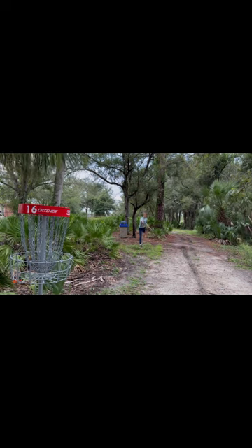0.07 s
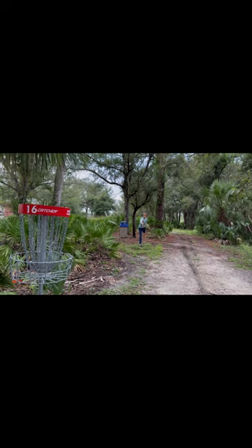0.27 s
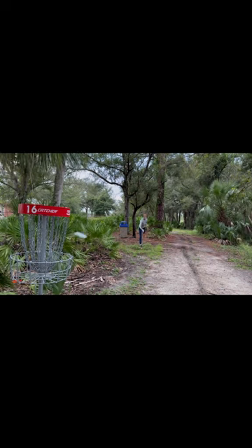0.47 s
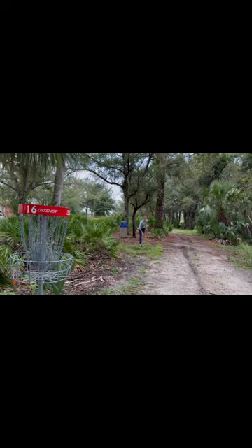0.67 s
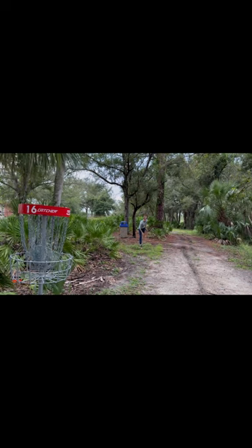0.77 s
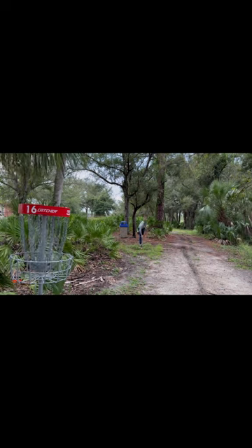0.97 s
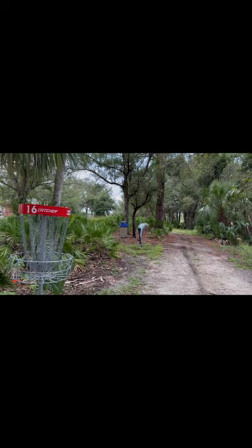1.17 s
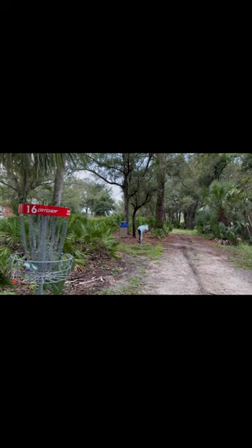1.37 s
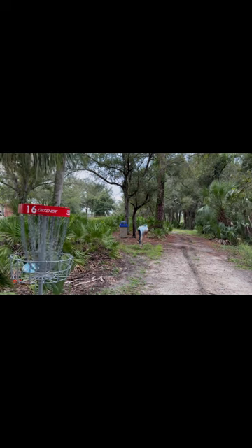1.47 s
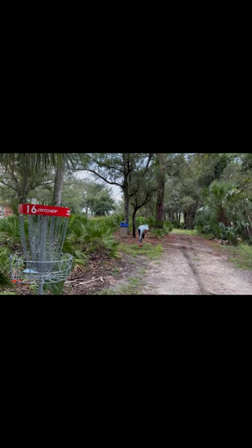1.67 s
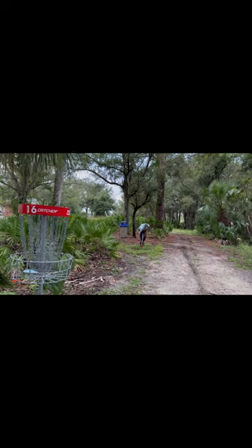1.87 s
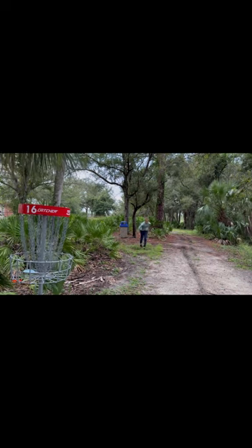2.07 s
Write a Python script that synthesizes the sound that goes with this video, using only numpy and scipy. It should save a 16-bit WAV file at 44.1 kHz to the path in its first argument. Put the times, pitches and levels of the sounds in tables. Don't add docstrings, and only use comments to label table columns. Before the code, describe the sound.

Metal chains of a disc golf basket clash and jingle as a plastic disc hits them outdoors

```python
import sys
import numpy as np
from scipy import signal
from scipy.fft import rfft, irfft, next_fast_len
from scipy.io import wavfile

SR = 44100
rng = np.random.default_rng(int(sys.argv[2]) if len(sys.argv) > 2 else 0)


def waveform_to_disk(signal):
    frames = np.transpose(np.atleast_2d(signal))
    scaled = np.clip(frames, -1, 1) * 32767
    samples = np.round(scaled).astype(np.int16)
    wavfile.write(sys.argv[1], SR, samples)


def natural_amplitude(level_db):
    exponent = np.asarray(level_db, float) / 20
    return 10 ** exponent


N = 93977

IMPACT_S = .5655
HIT_SPREAD_DB = 4.5


def in_time(rows):
    return np.interp(np.arange(N) / SR, *np.transpose(rows))


def at_hz(points, hz, column=1):
    points = np.array(points)
    return np.interp(np.log(hz + 1), np.log(points[:, 0]), points[:, column])


def rms_one(x):
    return x / np.sqrt(np.mean(x ** 2) + 1e-20)


def drift(rate_hz):
    r = np.exp(-2 * np.pi * rate_hz * 40 / SR)
    slow = signal.lfilter([1], [1, -2 * r, r * r], rng.standard_normal(N // 40 + 2002))
    slow = slow[2000:]
    return np.interp(np.arange(N) / 40, np.arange(len(slow)), rms_one(slow))


def ring(clicks, hz, t60):
    r, w = natural_amplitude(-60 / (t60 * SR)), 2 * np.pi * hz / SR
    return signal.lfilter([0, np.sin(w)], [1, -2 * r * np.cos(w), r * r], clicks + 1e-18)


def band_pass(x, low_hz, high_hz):
    return signal.sosfilt(signal.butter(2, [low_hz, high_hz], "band", fs=SR, output="sos"), x)


def grains(per_s, spread_db):
    sizes = natural_amplitude(spread_db * np.minimum(rng.exponential(1, N), 4)) * rng.choice([-1, 1], N)
    return sizes * (rng.random(N) < per_s / SR)


def clicks_at(s, height):
    clicks = np.zeros(N)
    clicks[(s * SR).astype(int)] = height
    return clicks


def struck(hits, modes, focus_db, rise_s, spread_db):
    s, db, centre_hz = np.transpose(hits)
    luck, out = rng.standard_normal((len(s), len(modes))), np.zeros(N)
    for (hz, level_db, t60), chance in zip(modes, luck.T):
        off_pitch_db = focus_db * abs(np.log2(hz / centre_hz))
        clicks = clicks_at(s, natural_amplitude(db + level_db + spread_db * chance - off_pitch_db))
        swell_t60 = 1 / (1 / t60 + 1 / (rise_s * np.log(1000)))
        out += ring(clicks, hz, t60) - ring(clicks, hz, swell_t60)
    return out


def bursts(hits, t60):
    s, db = np.transpose(hits)[:2]
    envelope = signal.lfilter([1], [1, -natural_amplitude(-60 / (t60 * SR))], clicks_at(s, natural_amplitude(db)) + 1e-18)
    return envelope * rng.standard_normal(N)


def scatter(x, t60):
    t = np.arange(int(.4 * SR)) / SR
    tail = rng.standard_normal(len(t)) * natural_amplitude(-60 * t / t60)
    return signal.fftconvolve(x, tail / np.sqrt(np.sum(tail ** 2)))[:N]


def ports(x, other, column):
    # Hz, radians for the basket, radians for the background.
    port_phase = np.array([(20, 0, 0), (1500, 1.5, .3), (1900, .5, .3), (2800, 2.2, .6), (3900, -.2, .6),
                           (6900, .9, .9), (7700, 3, 3), (8000, 5.9, 5.8), (9000, 6.2, 5.6), (9900, 4.1, 4),
                           (10400, 3.8, np.pi), (10750, np.pi, np.pi), (11750, np.pi, np.pi),
                           (12300, 2.5, np.pi), (13400, 0, 0)])
    # Hz, dB for the basket, dB for the background.
    port_tilt = [(200, .3, 0), (1000, 6, .8), (1700, 0, -.2), (3000, 4, 1.2), (5200, 3.5, 4),
                 (6200, 1.5, 5), (7700, 2.2, 5), (8400, 0, 0)]
    # Hz, correlation (0 to 1) for the basket, for the background.
    port_likeness = [(120, .8, .72), (400, .88, .55), (1500, .7, .2), (3500, .4, .45), (4300, .97, .4),
                     (6000, .55, .3), (8500, .9, .65), (9700, .5, .55), (10350, 1, 1)]
    size = next_fast_len(N + SR // 4)
    hz = np.arange(size // 2 + 1) * SR / size
    alike = at_hz(port_likeness, hz, column)
    lead = np.interp(hz, port_phase[:, 0], port_phase[:, column])
    same = np.sqrt((1 + alike) / 2) * rfft(x, size)
    apart = np.sqrt((1 - alike) / 2) * rfft(other, size)
    turn = natural_amplitude(-at_hz(port_tilt, hz, column)) * np.exp(-1j * lead)
    return irfft(np.array([same + apart, (same - apart) * turn]), size)[:, :N]


def air():
    # Hz, level in dB per Hz.
    air_colour = [(25, -70), (60, 4), (120, -5.5), (250, -12), (1000, -12), (3000, -29), (9500, -30),
                  (12000, -29), (14500, -27)]
    # time in seconds, level in dB.
    rumble_swell = [(0, -44), (.26, -45.5), (.55, -47.5), (.9, -48.5), (1.3, -43), (1.55, -42), (1.9, -44),
                    (2.13, -43.5)]
    edges, white, hiss = 25 * 2 ** np.arange(0, 9.6, .5), rng.standard_normal((2, N)), 0
    for k, (low, high) in enumerate(zip(edges, edges[1:])):
        level_db = at_hz(air_colour, np.sqrt(low * high)) + 1.5 * drift(21.0)
        hiss = hiss + band_pass(white[k % 2], low, high) * natural_amplitude(level_db)
    rumble_hz, rumble_width_hz = 68.3, 39
    rumble = ring(rng.standard_normal(N), rumble_hz, np.log(1000) / np.pi / rumble_width_hz)
    both = natural_amplitude(-42.5) * rms_one(hiss) + rms_one(rumble) * natural_amplitude(6.5 + in_time(rumble_swell))
    return signal.sosfilt(signal.butter(2, 62.5, "high", fs=SR, output="sos"), both)


def thumps():
    # start in seconds, peak in dB, pitch in Hz, t60 in seconds.
    shudders = [
        (0.234, -32, 71.4, 0.19),
        (0.939, -34.5, 72.4, 0.17),
        (1.367, -39, 88, 0.06),
        (1.404, -27, 65, 0.16),
        (1.469, -35, 68, 0.18),
        (1.552, -31, 67, 0.16),
        (1.646, -32, 98.6, 0.085),
        (1.669, -26, 102.5, 0.19),
        (1.864, -28.5, 91.5, 0.14),
        (2.067, -31.5, 66, 0.068),
    ]
    rise_s = 0.0068
    out, t = np.zeros(N + SR), np.arange(SR) / SR
    for s, db, hz, t60 in shudders:
        swell = (1 - np.exp(-t / rise_s)) ** 2
        out[int(s * SR):][:SR] += swell * natural_amplitude(db + 6 - 60 * t / t60) * np.sin(2 * np.pi * hz * t)
    return out[:N]


def disc():
    # start in seconds, peak in dB, pitch rung most in Hz.
    knocks = [(.558, -19.5, 1500), (.5655, -9, 1250), (.5665, -22.5, 740), (.569, -25, 320),
              (.566, -17.5, 1490), (.578, -21, 1450), (.586, -21.5, 730), (.594, -14, 646),
              (.601, -27, 850), (.615, -14, 940), (.6175, -12, 540), (.628, -32, 900), (.641, -37, 800),
              (.662, -30, 746), (.76, -32, 1450), (.865, -17.5, 960), (.8655, -28.5, 664), (.866, -44, 420),
              (.927, -28, 398), (.945, -26, 1490), (.96, -36, 1600), (.975, -34, 1500), (1.192, -30, 785),
              (1.436, -31, 890), (1.636, -34, 1100), (1.6365, -34, 616), (1.637, -30.5, 335),
              (1.6362, -28.5, 1700), (1.721, -30, 990)]
    # pitch in Hz, level in dB, t60 in seconds.
    plastic_modes = [(320, -5, .05), (540, -5, .04), (720, -5, .04), (940, -5, .035), (1200, -5, .03),
                     (1450, -7, .025), (1750, -12, .02), (2350, -16, .02)]
    scuff = band_pass(bursts(knocks, t60=0.042), 400, 1600)
    body = struck(knocks, plastic_modes, focus_db=18, rise_s=0.0013, spread_db=1.5)
    return body + natural_amplitude(-9) * 3 * scuff


def cage_ticks():
    # start in seconds, peak in dB.
    cage_hits = [(0.5671, -10.5), (0.6232, -16.5), (0.7788, -23), (0.8373, -26), (0.913, -28),
                 (0.9568, -21), (1.04, -30.5), (1.0877, -29), (1.1174, -27.5), (1.1928, -30.5),
                 (1.2118, -39), (1.2856, -32.5), (1.34, -39), (1.3745, -33.5), (1.4074, -35),
                 (1.4503, -28.5), (1.504, -38), (1.5974, -53), (1.6279, -28), (1.6892, -33), (1.8673, -39),
                 (2.0833, -40), (1.7461, -34), (1.8263, -35), (2.0374, -46)]
    return natural_amplitude(-7.5) * bursts(cage_hits, t60=0.14)


def cage_wires():
    # start in seconds, peak in dB, pitch rung most in Hz.
    cage_rings = [(.5678, -15, 4940), (.6232, -33, 5960), (1.0387, -33, 2980), (1.039, -28, 8000),
                  (1.0896, -23.5, 7900), (1.1165, -51, 3560), (1.4493, -29.5, 6500), (.7808, -27, 6900),
                  (.9574, -28, 6050), (1.2872, -37, 8500), (1.6892, -41, 3800), (1.6279, -44, 8000),
                  (1.7461, -40.5, 6600), (1.8254, -30.5, 8610), (1.8262, -30, 3960), (2.0374, -43.5, 8870)]
    wire_hz = [3030, 2976, 3770, 5700, 6460, 6950, 7250, 8010, 8280, 8700, 9200, 9470, 12740, 13140]
    # level in dB, t60 in seconds.
    wire_levels = [(-12, 0.24), (-8.5, 0.21), (-11.5, 0.16), (-12, 0.1), (-5.5, 0.058), (-4, 0.037),
                   (-5.5, 0.085), (-18, 0.26), (-9.5, 0.11), (-9, 0.064), (-12, 0.11), (-12, 0.088),
                   (-29, 0.15), (-9, 0.12)]
    modes = np.column_stack([wire_hz, wire_levels])
    return struck(cage_rings, modes, focus_db=9.0, rise_s=.0003, spread_db=HIT_SPREAD_DB)


def pole():
    # start in seconds, peak in dB, pitch offset in Hz, t60 in seconds.
    pole_hits = [(0.613, -16.5, 7.5, 0.11), (0.6235, -4, 5.5, 0.081), (0.633, -5.5, 9, 0.04),
                 (0.644, -15, 59, 0.035), (0.671, -18.5, 7, .1), (0.711, -22, 0, 0.05),
                 (.745, -31, 22.5, 0.089), (0.799, -29, 4, 0.066), (.82, -46, 39.5, .1),
                 (.865, -32, -0.5, 0.065), (.89, -37.5, 30, 0.086), (.9584, -35, 19, 0.067),
                 (.985, -51, 2.5, 0.13), (1.105, -27.5, 100.5, .06), (1.209, -29.5, 402, 0.055),
                 (1.262, -40, 144, 0.048), (1.277, -38, 60, 0.063), (0.693, -18.5, 11, 0.15),
                 (0.7695, -24.5, 19.5, 0.055), (0.8409, -16, 134.5, 0.065), (0.848, -17, 15.5, 0.058),
                 (.9145, -36.5, 14.5, 0.14), (1.0893, -22, 146.5, 0.069), (1.115, -31.5, 3.5, 0.17),
                 (1.2144, -33, 1, 0.053), (1.238, -31, 34.5, 0.081), (1.4401, -18, 37, 0.1),
                 (1.441, -24.5, -15.5, 0.53), (1.4415, -27, 702, 0.043), (1.451, -29.5, 602, .05),
                 (1.508, -29, 46, 0.095)]
    # pitch ratio, level in dB.
    pole_modes = [(1, -1), (1.018, -11), (1.035, -13), (1.068, -17), (1.125, -19), (1.21, -22)]
    pole_hz, rise_s, neighbour_t60_s = 4345, 0.0012, .055
    out, t = np.zeros(N + SR), np.arange(SR) / SR
    luck = rng.standard_normal((len(pole_hits), len(pole_modes), 2))
    for (s, db, offset_hz, t60), chances in zip(pole_hits, luck):
        for (ratio, level_db), (chance, turn) in zip(pole_modes, chances):
            if ratio == 1:
                chance, turn, fade_s = 0, 0, t60
            else:
                fade_s = neighbour_t60_s
            height = natural_amplitude(db + level_db + HIT_SPREAD_DB * chance - 60 * t / fade_s)
            cycles = (pole_hz + offset_hz) * ratio * (t + s) + turn
            out[int(s * SR):][:SR] += (1 - np.exp(-t / rise_s)) * height * np.sin(2 * np.pi * cycles)
    return out[:N]


def chain_shake():
    # time in seconds, level in dB.
    shake = [(.56, -51), (.568, -23.5), (.63, -25), (.654, -32.5), (.736, -44.5), (.78, -37), (.84, -40),
             (.93, -45.5), (.96, -41), (1.016, -45), (1.122, -41.5), (1.176, -46), (1.42, -52),
             (1.452, -49), (1.484, -48), (1.8, -53), (1.834, -51), (2.12, -60.5)]
    return in_time(shake) - 60 * (np.arange(N) < IMPACT_S * SR)


def jingle(shake_db, count=24):
    # centre in Hz, spread in Hz.
    link_hz = [(10350, 105), (11020, 70), (11800, 70), (12350, 130), (4420, 110)]
    # level in dB, t60 in seconds.
    link_levels = [(-1, .2), (-7, .2), (-14, .15), (-15, .08), (-22, .1)]
    since = np.arange(N) / SR - IMPACT_S
    fade_db = 9 * since
    force = natural_amplitude(-36.5 - fade_db + 0.55 * (shake_db - shake_db.max())) * (since > 0)
    clicks = force * grains(per_s=1300, spread_db=5.5)
    dealt = rng.integers(0, count, N)
    sizes = np.tan(np.linspace(-1.05, 1.05, count))
    out = np.zeros(N)
    for (hz, spread_hz), (db, t60) in zip(link_hz, link_levels):
        family = np.zeros(N)
        for k, off in enumerate(rng.permutation(sizes)):
            family += ring(clicks * (dealt == k), hz + spread_hz * off, t60)
        out += natural_amplitude(db + 4 * drift(14)) * family
    return out


def rattle(shake_db, count=60):
    # Hz, level in dB.
    rattle_colour = [(900, -3.5), (2100, -2.5), (3000, 1.5), (5000, 3.5), (7500, 8.5), (10000, -3),
                     (12500, 3), (15500, -1.5)]
    clicks, dealt = grains(per_s=9000, spread_db=2), rng.integers(0, count, N)
    pitches = np.linspace(900, 15600, count) + rng.uniform(-60, 60, count)
    rings = np.zeros(N)
    for k, hz in enumerate(pitches):
        rings += natural_amplitude(at_hz(rattle_colour, hz)) * ring(clicks * (dealt == k), hz, t60=0.027)
    return rms_one(rings) * natural_amplitude(shake_db + 2.5 + 1.5 * drift(25))


def scene():
    shake_db = chain_shake()
    chains = rattle(shake_db) + jingle(shake_db)
    basket = chains + pole() + cage_wires() + cage_ticks() + disc() + thumps()
    basket = basket + natural_amplitude(-14.5) * scatter(basket, t60=0.24)
    return ports(basket, scatter(basket, t60=0.07), column=1) + ports(air(), air(), column=2)


def top_cut(x):
    return signal.sosfilt(signal.butter(12, 16950, fs=SR, output="sos"), x)


def record(dry):
    cutoff_hz = 15800
    mix = signal.sosfilt(signal.cheby2(12, 60, cutoff_hz * 1.03, fs=SR, output="sos"), dry)
    return top_cut(mix)


dry = scene()
out = record(dry)
waveform_to_disk(out)
```